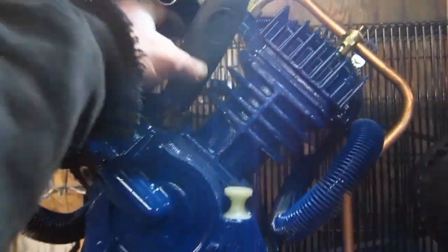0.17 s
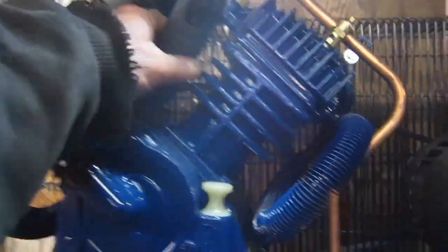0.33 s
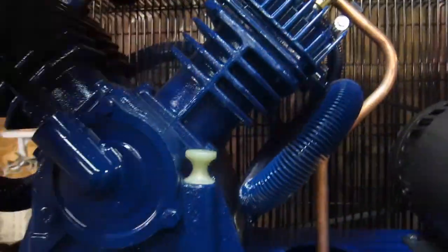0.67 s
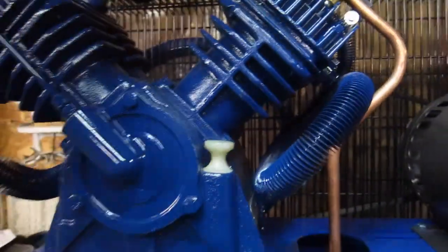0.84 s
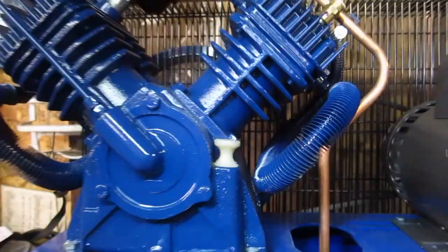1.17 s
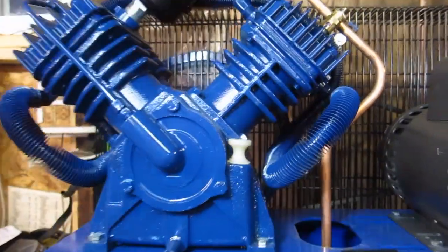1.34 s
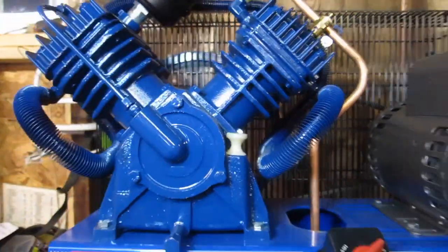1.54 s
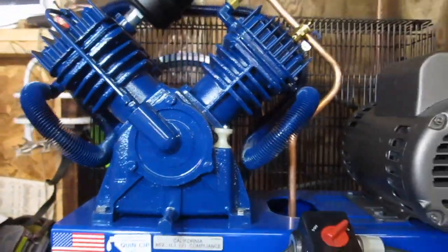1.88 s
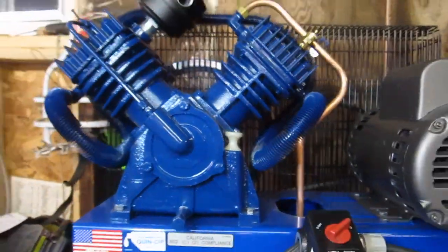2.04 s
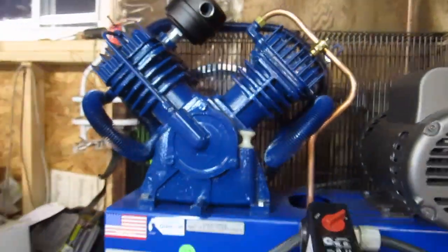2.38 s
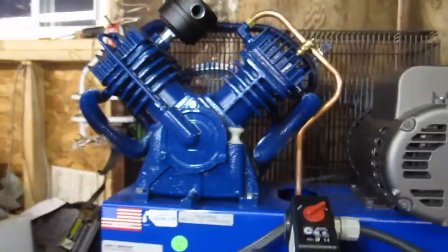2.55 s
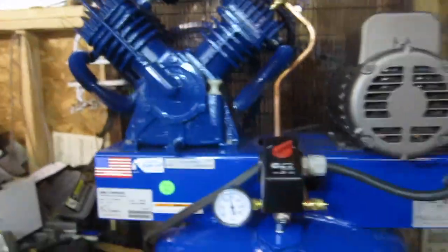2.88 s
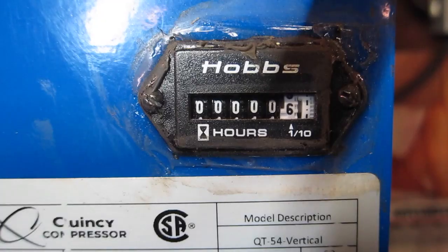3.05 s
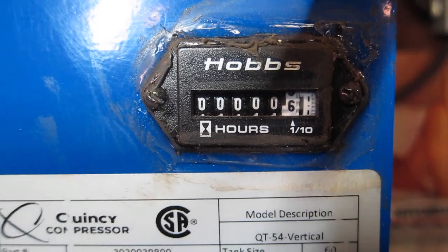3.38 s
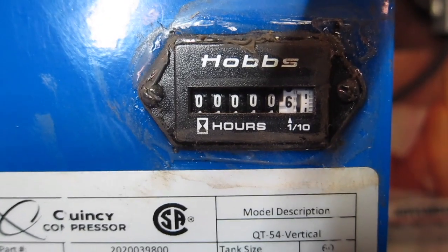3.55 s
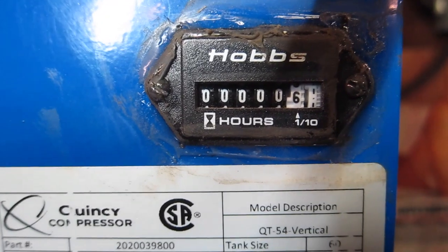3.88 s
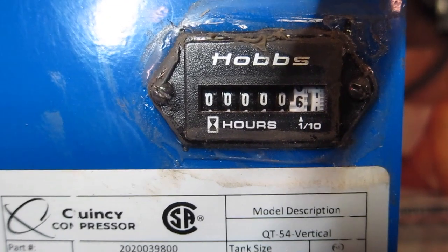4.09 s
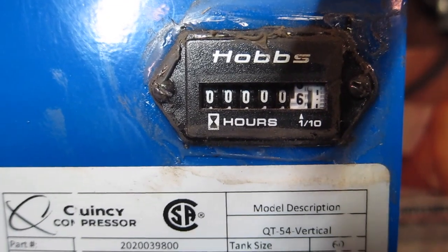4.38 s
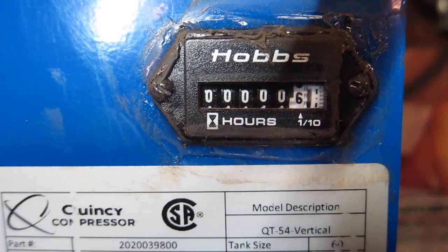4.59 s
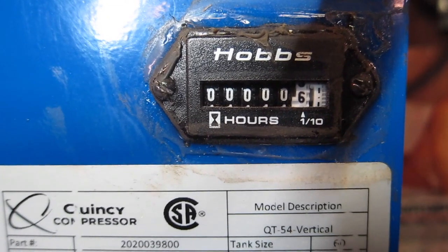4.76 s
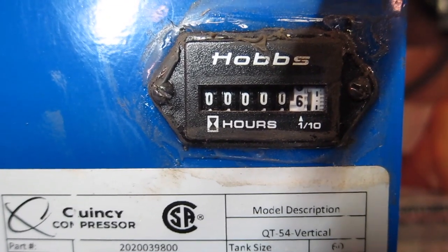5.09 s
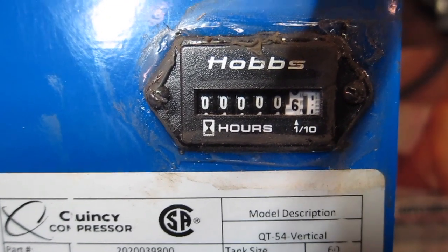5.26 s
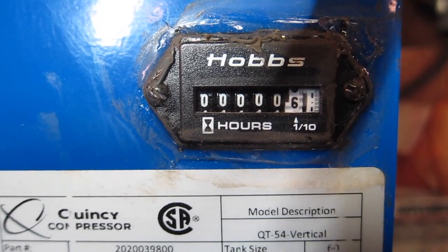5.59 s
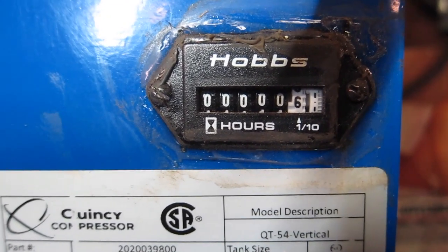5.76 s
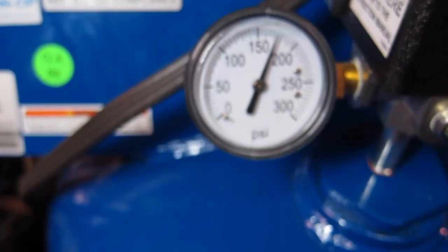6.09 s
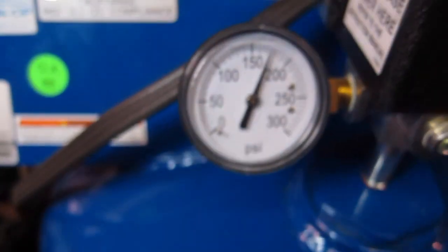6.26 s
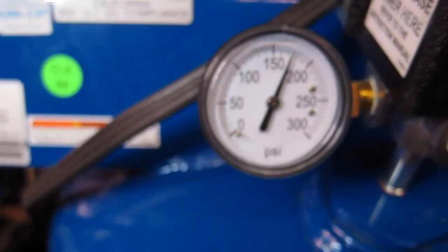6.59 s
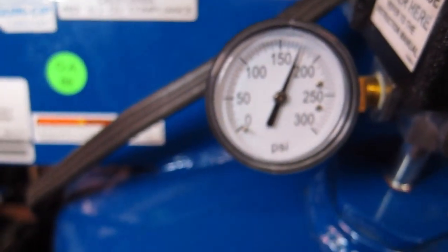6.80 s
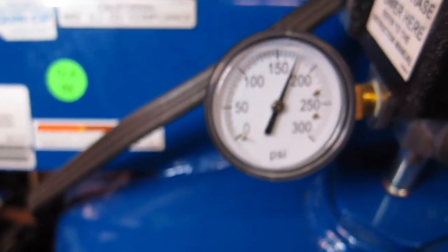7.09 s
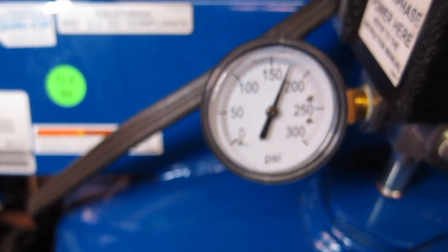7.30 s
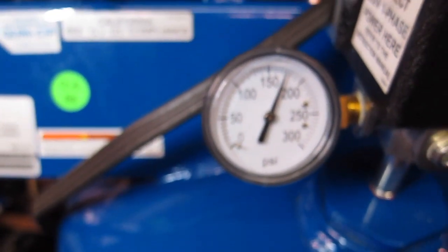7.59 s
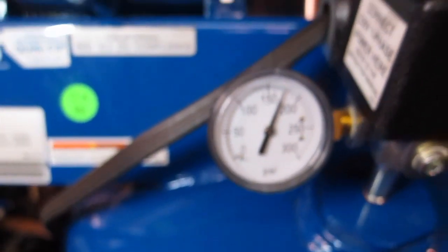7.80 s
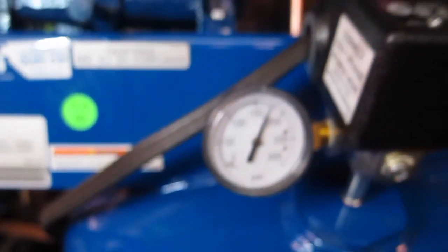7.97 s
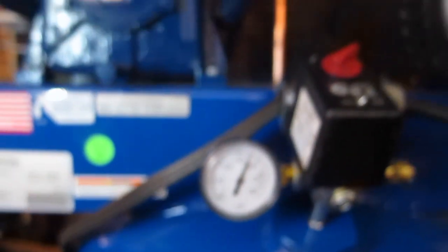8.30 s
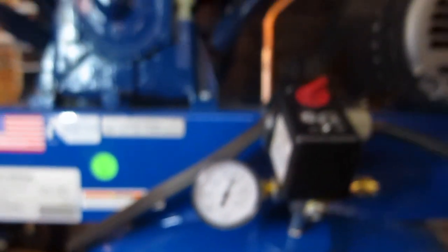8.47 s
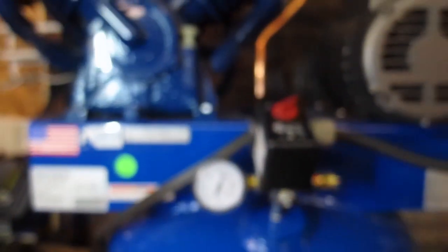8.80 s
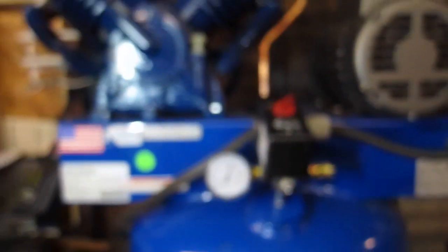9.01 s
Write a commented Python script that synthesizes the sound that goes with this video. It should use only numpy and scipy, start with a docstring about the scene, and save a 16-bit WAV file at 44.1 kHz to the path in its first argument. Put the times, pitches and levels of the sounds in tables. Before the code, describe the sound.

An air compressor thumps and whines steadily, then cuts out with a gush of escaping air that fades in a long hiss.

```python
"""A belt-driven piston air compressor in a garage. First the microphone is by the cylinder heads:
two intake strokes a turn thump, the valves knock the iron and puff, the motor whines and hums.
At 3 s it is against the tank, where the whine is stronger. From 6.2 s the motor is off and the
unloader valve blows the pipe empty: a gush, two breathy whistles, then a long hiss that sinks with
the pressure and narrows to the centre. Two soft thuds fall in the still air near the end."""
import sys
import numpy as np
from scipy import signal
from scipy.fft import rfft, irfft, next_fast_len
from scipy.io import wavfile

SR = 44100
rng = np.random.default_rng(int(sys.argv[2]) if len(sys.argv) > 2 else 0)


def inscribe(sig):
    """Save sig as 16-bit PCM at rate SR to the path in sys.argv[1].

    A 1-D sig is mono; a 2-D sig holds one channel per row.
    Samples are clipped to [-1, 1] before scaling.
    """
    pcm = np.round(np.clip(np.atleast_2d(sig).T, -1, 1) * 32767)
    wavfile.write(sys.argv[1], SR, pcm.astype(np.int16))


N = 403074
M = next_fast_len(round(3.2 * SR))   # samples for each microphone position
HZ = np.maximum(np.arange(M // 2 + 1) * SR / M, 1)
HEADS_S, TANK_S, BLEED_S = (-1, 3.045), (3.045, 6.172), (6.172, 10)   # when each position is heard

# Room tone of the garage. Each row: frequency in Hz, relative level in dB.
ROOM_COLOUR = [(25, 2), (100, 1), (250, 4), (500, -10), (1200, 1), (2000, -2)]
# Soft thuds. Each row: start in seconds, level in dB.
THUDS = [(8.408, -45), (8.67, -57)]

# Broad colour of the unloader jet. Each row: frequency in Hz, relative level in dB.
JET_COLOUR = [(30, -23), (100, -13), (500, -10.5), (1700, -10), (2300, -18), (7000, -21), (13500, -10.5),
              (14700, -29), (15800, -26)]
# Resonances of valve and pipe. Each row: centre in Hz, width in Hz, relative level in dB.
JET_RESONANCES = [(2580, 630, 3), (3180, 440, -4.5), (3805, 120, -4.5), (4740, 890, 1), (6684, 1200, 5.5),
                  (9580, 370, -16.5), (10650, 860, -13.5), (11550, 260, -12.5), (12350, 400, -24),
                  (13550, 650, -6), (15500, 770, -5.5)]
# Stereo width of the jet. Each row: frequency in Hz, side minus mid in dB.
JET_WIDTH = [(60, -3), (92, -4), (140, -1), (210, -3), (330, -2), (500, -3), (770, -3), (1170, -2.5),
             (1790, -5.5), (2740, -10), (4190, -4.5), (6410, -4.5), (9810, 0), (15000, 9)]
# Edges of the jet's nine bands, in Hz.
JET_BAND_EDGES = [20, 500, 1900, 2850, 3550, 4200, 5700, 8100, 12300, 16000]
# The bands, low to high. Each row: level at full flow in dB, shares of the fall of jet, roar and pipe
# tones, extra level in dB as the valve opens.
JET_BANDS = [(-34.5, .01, 1.3, .01, 3), (-29, .01, 1.04, .01, 0.5), (-25, .01, -0.094, 0.88, 2.5),
             (-22.5, .01, 0.22, 0.73, 0.5), (-32.5, 0.49, -0.047, 0.16, 7), (-23, 0.9, -0.06, 0.011, 1),
             (-22.5, 0.41, 0.2, .01, 1), (-26, 0.055, .4, 0.0086, 3), (-32, 0.47, 0.2, .01, -3)]
# The jet as the pressure falls. Each row: time in seconds, level in dB, left minus right in dB.
JET_FALL = [(6.19, -22.5, 0), (6.82, -22, 0), (7.05, -21, -1), (7.15, -22, -0.5), (7.58, -24.5, -1),
            (8.1, -30.5, -0.5), (8.5, -38, -.3), (9.14, -44.5, 1)]
# Its low roar and its two lowest pipe tones. Each row: time in seconds, level in dB.
ROAR_FALL = [(6.19, -30), (7.26, -32), (7.71, -48), (8.08, -52.5), (8.54, -56.5), (8.59, -58), (9.14, -65)]
PIPE_FALL = [(6.19, -20.5), (6.7, -22.5), (6.79, -25), (6.86, -18), (6.98, -28.5), (7.13, -26.5),
             (7.24, -20), (7.52, -20.5), (7.7, -22.5), (8.15, -27.5), (8.36, -39.5), (8.55, -45),
             (9.14, -48.5)]
FULL_FLOW_DB = (-22.5, -29.5, -21)   # jet, roar and pipe tones count their fall from here
# The top two bands reach the ports out of step, which makes them wide.
# Each row: side level in dB, end of its hold in seconds, fall in dB per second.
TREBLE_SPREAD = [(-20, 7, 11), (-30.5, 7.5, 15)]
# The fading hiss narrows to the centre, band by band.
# Each row, for one lower band: start in seconds, loss of side level in dB per second.
NARROWING = [(7.5, 25), (7.5, 37), (8.0, 28), (8.0, 16), (8.0, 17), (7.8, 6), (7.8, 9)]
# The two ports cancel in the centre at two pitches; the upper climbs as the microphone turns away.
# One list a pitch. Each row: time in seconds, frequency in Hz, depth from 0 to 1.
PORT_NULLS = [
    [(6.2, 5700, 0.3), (7.5, 5620, 0.6), (8.2, 5620, 0.5), (8.7, 5470, 0)],
    [(6.85, 10060, .01), (7.25, 10800, .9), (7.7, 10600, .95), (8.1, 11300, 1), (8.45, 12200, .01)],
]
# Width of each null, in Hz.
PORT_NULL_WIDTHS = [390, 1100]
# Whistles in the valve throat. Each row: start and end of the loudest part in seconds, level in dB,
# rise and fall in dB per second, first and last pitch in Hz, middle and time scale of the glide in seconds.
WHISTLES = [(6.85, 6.89, -19, 350, 450, 3000, 2560, 6.84, .03),
            (7.0, 7.1, -23, 200, 110, 4560, 2950, 7.17, .035)]

MAINS_HZ, HEADS_MOTOR_HZ, TANK_MOTOR_HZ = 60, 57.785, 57.895   # the motor in turns per second
HEADS_CRANK, TANK_CRANK = (22.524, 1.0157), (22.571, 3.367)   # turns per second, time of a strong stroke
HEADS_MIX, TANK_MIX = (-24.5, -26.5, -35), (-27, -27, -19.5)   # intake, iron and rush, motor in dB
# The microphone's distance shifts a little at the heads and at the tank.
# Each row: time in seconds, then changes of level, brightness, intake and valve knock in dB.
HEADS_NEARNESS = [(0, 2, -2.5, -0.5, -0.5), (.6, 1.5, -1.5, 1, -1.5), (1.2, 0.5, -1.5, -0.5, 0),
                  (1.95, -.5, -.5, .5, 0.5), (2.8, 0.2, 2, -0.1, 0.5), (3.04, 1, 2.5, -0.5, -0.5)]
TANK_NEARNESS = [(3.05, 0.32, -0.087, 1, .1), (3.6, 0, 0.18, 0.088, .1), (6.17, 0, -0.41, 0.15, 0.11)]
# Where the machine sits in the image. Each row: frequency in Hz, left minus right in dB.
HEADS_BALANCE = [(60, 0.0), (110, 0.92), (200, 0.31), (380, 0.5), (700, 0.0), (1290, -2.6), (2380, -1.4),
                 (4400, 0.0), (8120, 2.0), (15000, 1.0)]
TANK_BALANCE = [(60, 4), (110, 2), (200, 1.5), (380, 1.5), (700, 2.5), (1290, 1.0), (2380, -1), (4400, 1.0),
                (8120, 3.0), (15000, 2.0)]
# Motor tones. Each row: multiple of motor speed, added multiple of the mains, relative level in dB.
HEADS_MOTOR_TONES = [(0, 2, 1.5), (12, 0, 0.5), (20, 0, 2.5), (20, 2, 3.5), (21, 2, -6), (20, 4, -5.5),
                     (16, 0, -13), (60, 2, -24)]
TANK_MOTOR_TONES = [(0, 2, -13), (12, 0, -18), (20, 2, 1), (21, 2, -14.5), (19, 2, -13), (22, 2, -19.5),
                    (23, 2, -19)]
# Rush of fan, belt and air. Each row: frequency in Hz, relative level in dB.
HEADS_RUSH_COLOUR = [(30, -18), (70, -6), (300, 2), (800, 3), (1300, 2.5), (1700, -3), (2500, 2),
                     (4000, 0.5), (5200, -2), (6500, -6.5), (10000, -5.5), (12000, -6), (14000, -9.5),
                     (15200, -32.5)]
TANK_RUSH_COLOUR = [(30, -10.5), (100, 0), (300, -0.5), (600, 5.5), (1200, 8.5), (1600, 0.5), (2300, 4.5),
                    (2900, -1), (4500, -2.5), (6500, -8), (10000, -8.5), (12000, -9.5), (14100, -13.5),
                    (15200, -52)]
# Stereo width of the rush. Each row: frequency in Hz, side minus mid in dB.
HEADS_WIDTH = [(60, -24), (130, -20), (290, -20), (640, -19), (1410, -5.5), (3100, -6), (6820, -1.5),
               (15000, 1.5)]
TANK_WIDTH = [(60, -13.5), (130, -18), (290, -4.5), (640, -16.5), (1410, -8.5), (3100, 1), (6820, 2.5),
              (15000, 1)]
# Iron struck by the valves. Each row: pitch in Hz, seconds to die away by 60 dB, relative levels of
# the strong and the weak stroke in dB.
HEADS_IRON_MODES = [(584.5, 0.18, 0.5, -2), (661, 0.15, -2, -23), (778.3, 0.38, 1, -27),
                    (1008, 0.092, -6, -19), (2208, 0.15, -1.5, -25), (2350, 0.028, 4, -7),
                    (2482, 0.061, 7, 1), (2830, 0.036, -20, -15), (3604, 0.26, -16, -18),
                    (4560, .03, -2.5, -17), (10100, 0.03, -1, -22)]
TANK_IRON_MODES = [(568, 0.12, 14.5, 7), (768, 0.37, -16.5, -4.5), (970, 0.055, -22, -24),
                   (1140, .06, -15, -23), (1628, .1, -4.5, -14), (2160, 0.082, -12, -22),
                   (2370, 0.045, -13, -28), (2310, .3, -3, -9), (2645, 0.1, -2.5, -11.5),
                   (3400, 0.064, -12, -21), (4500, 0.062, -8, -22), (9930, 0.031, 1, -7)]
# Intake thump. Each row: multiple of the stroke rate, relative level in dB.
HEADS_INTAKE = [(1, -19.5), (2, -11.5), (3, -5), (4, -4.5), (5, -5.5), (6, -8.5), (7, -8.5), (8, -3.5),
                (9, -22.5), (10, -17.5), (11, -18)]
TANK_INTAKE = [(2, -14), (3, -5.5), (4, -16.5), (5, -3.5), (6, -7.5), (7, -8.5), (8, -5.5), (9, -16.5)]


def from_db(db):
    """Decibels to gain."""
    return 10 ** (np.asarray(db) / 20)


def in_time(rows, t):
    """The columns of a timed table, interpolated for every sample."""
    times, *columns = np.transpose(rows)
    return [np.interp(t, times, column) for column in columns]


def on_hz(rows):
    """A spectrum table as gains on the FFT grid."""
    hz, db = np.transpose(rows)
    return from_db(np.interp(np.log(HZ), np.log(hz), db))


def crossfade(span, fade_s, t):
    """Gain of one microphone position, faded at both ends."""
    return np.sqrt(np.clip(.5 + np.minimum(t - span[0], span[1] - t) / fade_s, 0, 1))


def drift(rate_hz):
    """A smooth random wander with spread 1."""
    pole = np.exp(-80 * np.pi * rate_hz / SR)
    slow = signal.lfilter([1], [1, -2 * pole, pole * pole], rng.standard_normal(M // 40 + 2002))[2000:]
    return np.interp(np.arange(M) / 40, np.arange(len(slow)), slow / slow.std())


def ring(clicks, hz, t60):
    """Each click sets a decaying sine ringing."""
    decay, step = from_db(-60 / (t60 * SR)), 2 * np.pi * hz / SR
    return signal.lfilter([0, np.sin(step)], [1, -2 * decay * np.cos(step), decay ** 2], clicks + 1e-18)


def noise_bands(source, colour, width, edges_hz):
    """Mid and side noise, coloured and split into overlapping bands."""
    mid_side = source * colour * np.array([np.ones_like(HZ), on_hz(width)])
    below = [1 / (1 + (HZ / edge) ** 24) for edge in edges_hz]
    return [irfft(mid_side * (high - low), M) for low, high in zip(below, below[1:])]


def garage(t):
    """The room behind the hiss: still air, a faint far hum and two dull thuds."""
    clicks = np.zeros(M)
    for start, db in THUDS:
        clicks[np.searchsorted(t, start)] = from_db(db)
    soft_blows = signal.lfilter(np.hanning(120) / 60, 1, clicks)
    hum = from_db(-65 + 2 * drift(4)) * np.sin(2 * np.pi * 310 * t)
    air = irfft(rfft(rng.standard_normal(M)) * on_hz(ROOM_COLOUR) * (HZ < 2000), M)
    return hum + ring(soft_blows, hz=200, t60=.1) + from_db(-66.5) * air / air.std()


def thin_ring(t, middle_s=2.915, half_s=.06, hz=3605, db=-33):
    """One thin high tone swells briefly by the heads."""
    return from_db(db) * np.exp(-((t - middle_s) / half_s) ** 4) * np.sin(2 * np.pi * hz * t)


def throat_whistles(t):
    """Air whistles in the valve throat: narrow noise around a pitch that slides down."""
    out = 0
    for start, end, db, rise, fall, high, low, middle, glide in WHISTLES:
        hz = low + (high - low) * (1 - np.tanh((t - middle) / glide / 2)) / 2
        phase = 2 * np.pi * np.cumsum(hz) / SR
        level_db = db - rise * np.maximum(start - t, 0) - fall * np.maximum(t - end, 0)
        out = out + from_db(level_db) * (drift(170) * np.cos(phase) + drift(170) * np.sin(phase))
    return out


def port_cancellation(mid, t):
    """The two ports cancel at the microphone in narrow, moving notches."""
    for rows, width_hz in zip(PORT_NULLS, PORT_NULL_WIDTHS):
        hz, depth = in_time(rows, t)
        carrier = np.exp(2j * np.pi * np.cumsum(hz) / SR)
        lowpass = signal.butter(2, width_hz / 2, fs=SR, output="sos")
        narrow_band = 2 * (signal.sosfiltfilt(lowpass, mid / carrier) * carrier).real
        mid = mid - depth * narrow_band
    return mid


def unloader_jet(t, gush_s=.35, calming_s=.4):
    """The valve opens with a sputtering gush; each band sinks with the pressure at its own pace."""
    power = on_hz(JET_COLOUR) ** 2
    for hz, width, db in JET_RESONANCES:
        power += from_db(db) ** 2 / (1 + (2 * (HZ - hz) / width) ** 2) ** 2
    noise = noise_bands(rfft(rng.standard_normal((2, M))), np.sqrt(power), JET_WIDTH, JET_BAND_EDGES)
    jet_db, pan_db = in_time(JET_FALL, t)
    levels_db = np.array([jet_db, *in_time(ROAR_FALL, t), *in_time(PIPE_FALL, t)])
    falls_db = levels_db - np.array(FULL_FLOW_DB)[:, None]
    open_s = np.maximum(t - BLEED_S[0], 0)
    gush, sputter_db = np.exp(-open_s / gush_s), 2 * np.exp(-open_s / calming_s)
    bands = []
    for band, (db, *shares, gush_db) in zip(noise, JET_BANDS):
        flow_db = db + np.dot(shares, falls_db) + gush_db * gush
        flicker_db = .5 * drift(25) + sputter_db * drift(7.1)
        bands.append(band / band[0].std() * from_db(flow_db + flicker_db))
    side = 0
    for (_, treble), (db, start, fall) in zip(noise[-2:], TREBLE_SPREAD):
        side += treble / treble.std() * from_db(db - fall * np.maximum(t - start, 0))
    for (_, lower), (start, fall) in zip(bands, NARROWING):
        side += lower * from_db(-fall * np.maximum(t - start, 0))
    mid = port_cancellation(sum(bands)[0], t)
    return np.array([(mid + side) * from_db(pan_db / 2), (mid - side) * from_db(-pan_db / 2)])


def motor(t, motor_hz, tones, waver_db, wander_turns):
    """Rotor slots and cooling fan whine; the mains pull adds hum and side tones."""
    rotor_turns = motor_hz * t + wander_turns * drift(3.3)
    out = 0
    for rotor_order, mains_order, db in tones:
        gain = from_db(db + waver_db * (rotor_order > 0) * drift(21)) * np.sqrt(2)
        cycles = rotor_order * rotor_turns + mains_order * MAINS_HZ * t + rng.random()
        out += gain * np.cos(2 * np.pi * cycles)
    return out


def air_rush(turns, crank_hz, bright_db, colour, width, lead_turns, puff_db, weak_puff, flicker_db,
             rattle_db):
    """Rush, with a low rattle that repeats each turn; all jumps as a valve opens, the treble most."""
    edges_hz = [25, 300, 700, 1600, 3300, 5500, 9500, 10500, 20000]   # one puff_db for each band
    in_turn = (turns + lead_turns) % 1
    patterns = rng.standard_normal((2, 2, SR // 20))[..., (in_turn * SR / crank_hz).astype(int)]
    blend = .28 * drift(.55)   # the repeating pattern slowly changes
    rattle = rfft(np.cos(blend) * patterns[0] + np.sin(blend) * patterns[1])
    rattle /= np.sqrt(1 + (HZ / 3000) ** 6)
    source = rfft(rng.standard_normal((2, M))) + from_db(rattle_db) * rattle
    puff = np.exp(-in_turn / .038) + weak_puff * np.exp(-((in_turn + .5) % 1) / .048)
    bands = noise_bands(source, on_hz(colour), width, edges_hz)
    shared_flicker = .1 * drift(7.1)
    presence = sum(bands[3:5])[0].std()
    bands[4] *= from_db(bright_db - bright_db.mean())
    mid, side = sum(band * from_db(db * puff + flicker_db * (shared_flicker + drift(13.4)))
                    for band, db in zip(bands, puff_db)) / presence
    return np.array([mid + side, mid - side])


def valve_knocks(turns, modes, lead_turns=.06, scatter_db=.7, rise_share=.1):
    """Valve plates slam twice a turn, harder on one cylinder; the heavy iron is slow to ring up."""
    stroke = np.floor(2 * (turns + lead_turns)).astype(int)
    hits = np.flatnonzero(np.diff(stroke)) + 1
    out = np.zeros(M)
    for hz, t60, strong_db, weak_db in modes:
        hit_db = np.where(stroke[hits] % 2, weak_db, strong_db)
        clicks = np.zeros(M)
        clicks[hits] = -from_db(hit_db + scatter_db * rng.standard_normal(len(hits)))
        out += ring(clicks, hz, t60) - ring(clicks, hz, rise_share * t60)
    return out


def intake_thump(turns, harmonics, waver_db=1.0, skew_rad=2.55):
    """Two like intake strokes a turn, each a short push and then a deeper pull."""
    out = 0
    for order, db in harmonics:
        gain = from_db(db + waver_db * drift(1.45)) * np.sqrt(2)
        out += gain * np.cos(4 * np.pi * order * turns + skew_rad)
    return out


def compressor(t, nearness, mix, balance, crank, intake, iron_modes, whine, **rush_settings):
    """The running machine from one microphone position: intake, motor, valves and air rush."""
    near_db, bright_db, breath_db, knock_db = in_time(nearness, t)
    intake_db, iron_db, whine_db = mix
    iron_db = iron_db + .38 * bright_db   # iron and rush grow louder with the brightness
    crank_hz, strong_stroke_s = crank
    turns = crank_hz * (t - strong_stroke_s)
    load_swing = 1 + .017 * np.cos(2 * np.pi * turns)
    centre = from_db(intake_db + breath_db) * intake_thump(turns, intake)
    centre += from_db(whine_db) * whine * load_swing
    centre += from_db(iron_db + knock_db) * valve_knocks(turns, iron_modes)
    machine = centre + from_db(iron_db) * air_rush(turns, crank_hz, bright_db, **rush_settings)
    left_right = on_hz(balance) ** np.array([[.5], [-.5]])
    return from_db(near_db) * irfft(rfft(machine) * left_right, M)


def scene():
    """Three positions in turn: by the heads, against the tank, at the unloader valve."""
    starts = [0, 3 * SR, N - M]
    t_heads, t_tank, t_bleed = [(start + np.arange(M)) / SR for start in starts]
    whine = motor(t_heads, HEADS_MOTOR_HZ, HEADS_MOTOR_TONES, waver_db=2.1, wander_turns=.0059)
    heads = compressor(t_heads, HEADS_NEARNESS, HEADS_MIX, HEADS_BALANCE, HEADS_CRANK, HEADS_INTAKE,
                       HEADS_IRON_MODES, whine, colour=HEADS_RUSH_COLOUR, width=HEADS_WIDTH,
                       lead_turns=.02947, puff_db=[1.5, 1.9, 1.3, .82, .8, 2, 16, 5.4], weak_puff=.18,
                       flicker_db=.9, rattle_db=-.5)
    whine = motor(t_tank, TANK_MOTOR_HZ, TANK_MOTOR_TONES, waver_db=1.0, wander_turns=.002)
    tank = compressor(t_tank, TANK_NEARNESS, TANK_MIX, TANK_BALANCE, TANK_CRANK, TANK_INTAKE,
                      TANK_IRON_MODES, whine, colour=TANK_RUSH_COLOUR, width=TANK_WIDTH,
                      lead_turns=.0303, puff_db=[1.3, 1.1, 1.3, 1.1, .61, 1.4, 8.1, 2.6], weak_puff=.24,
                      flicker_db=1.0, rattle_db=-6.5)
    bleed = unloader_jet(t_bleed) + throat_whistles(t_bleed) + garage(t_bleed)
    positions = [crossfade(HEADS_S, .034, t_heads) * (heads + thin_ring(t_heads)),
                 crossfade(TANK_S, .0085, t_tank) * tank,
                 crossfade(BLEED_S, .015, t_bleed) * bleed]
    out = np.zeros((2, N))
    for start, sound in zip(starts, positions):
        out[:, start:start + M] += sound
    return out


def record(dry):
    """Peaks are rounded; the sound has a steady narrow gap near 8 kHz, dull around it; the top is cut."""
    dull = signal.butter(1, (6900, 9300), "bandstop", fs=SR, output="sos")
    gap = signal.cheby2(6, 55, (7960, 8380), "bandstop", fs=SR, output="sos")
    top_cut = signal.ellip(12, .5, 60, 15750, fs=SR, output="sos")
    return signal.sosfilt(np.vstack([dull, gap, top_cut]), 1.301 * np.tanh(dry / 1.3))


dry = scene()
out = record(dry)
inscribe(out)
```